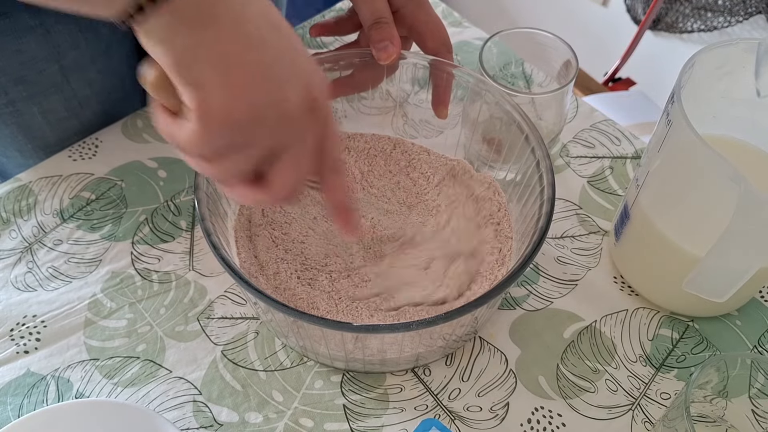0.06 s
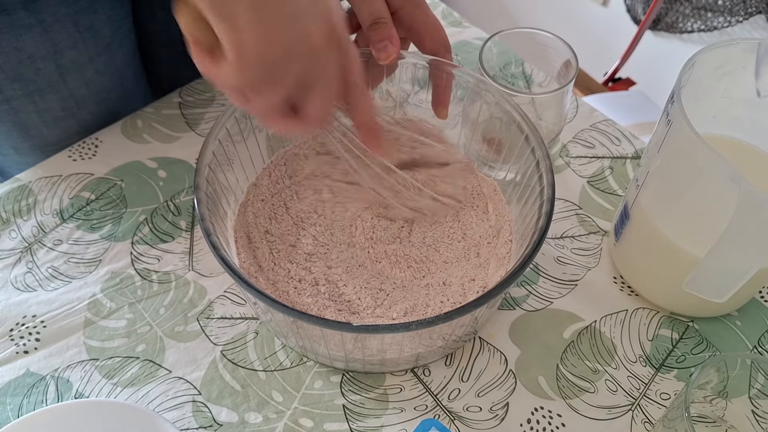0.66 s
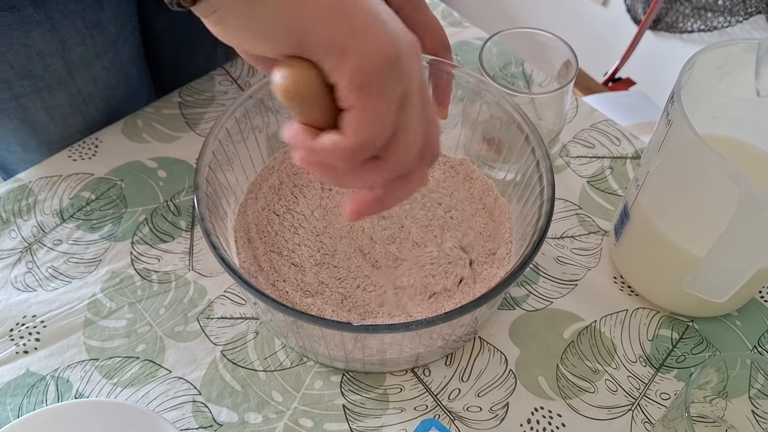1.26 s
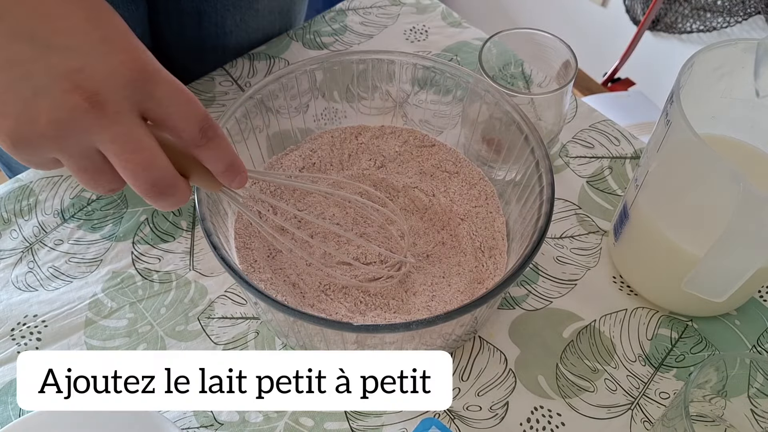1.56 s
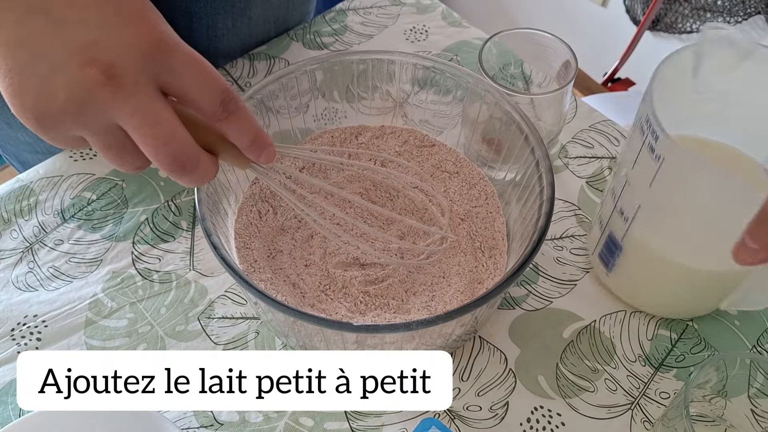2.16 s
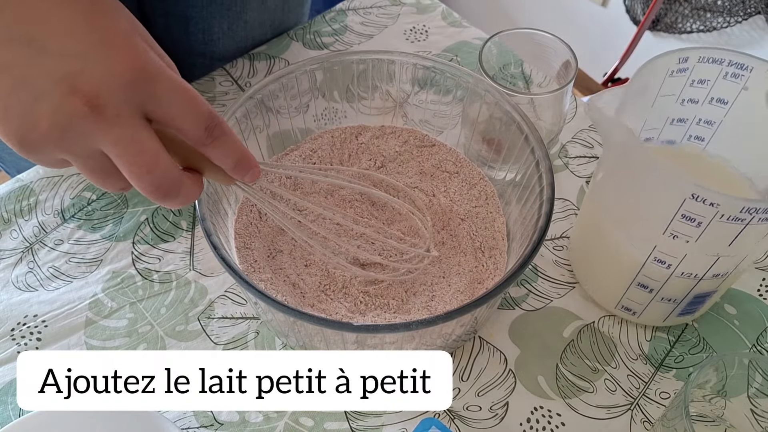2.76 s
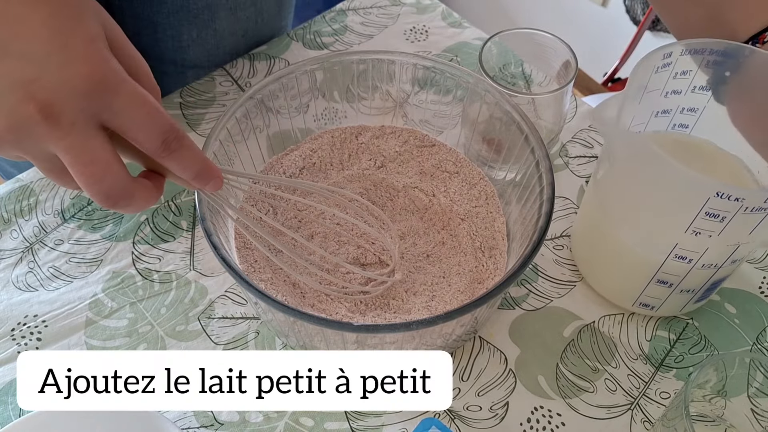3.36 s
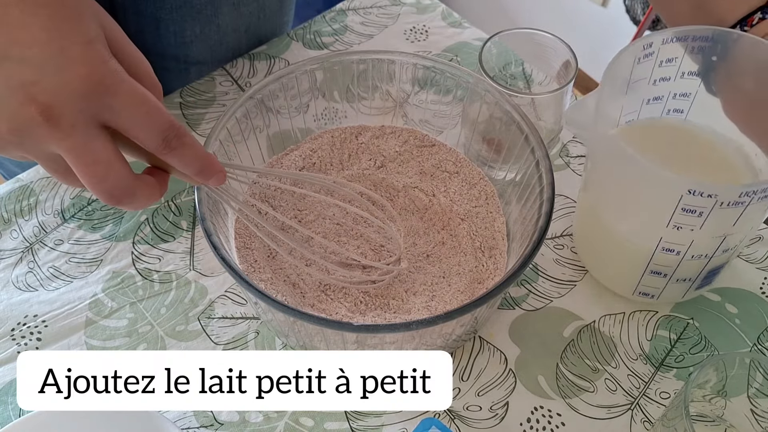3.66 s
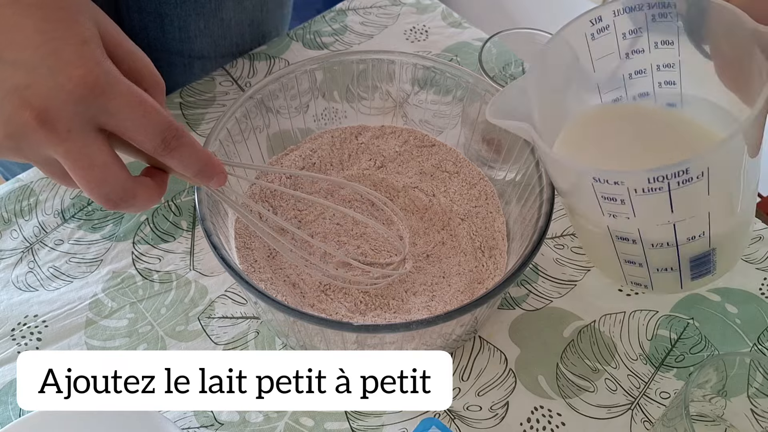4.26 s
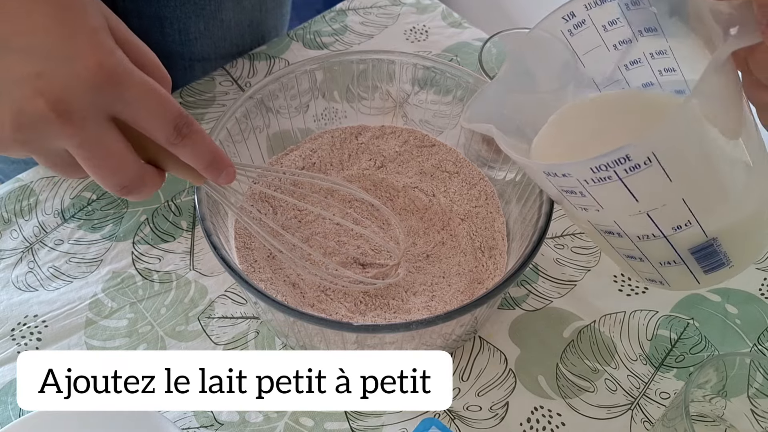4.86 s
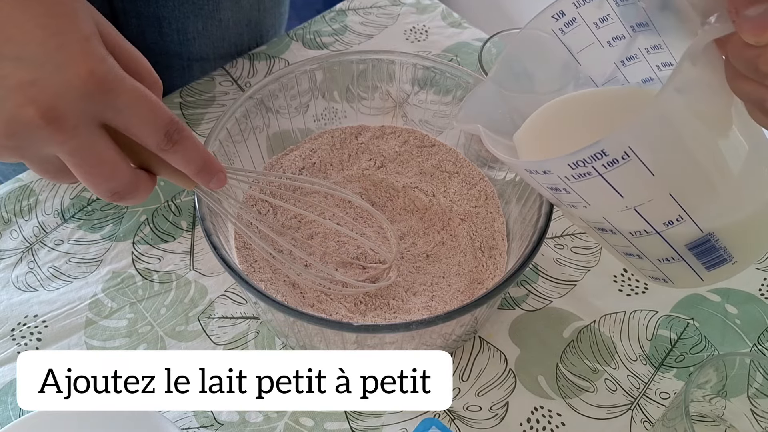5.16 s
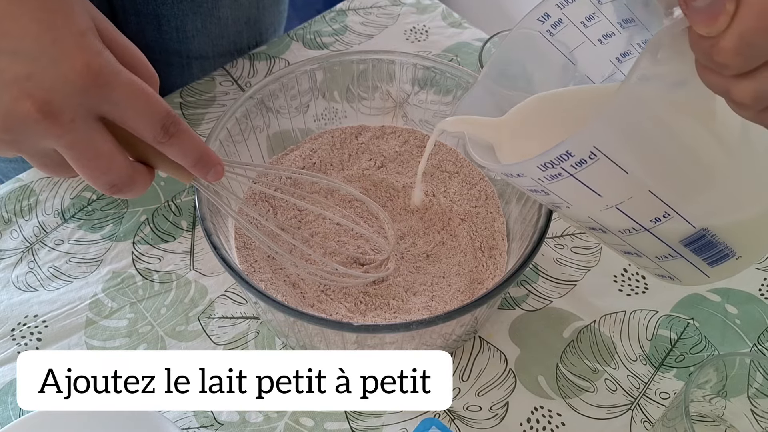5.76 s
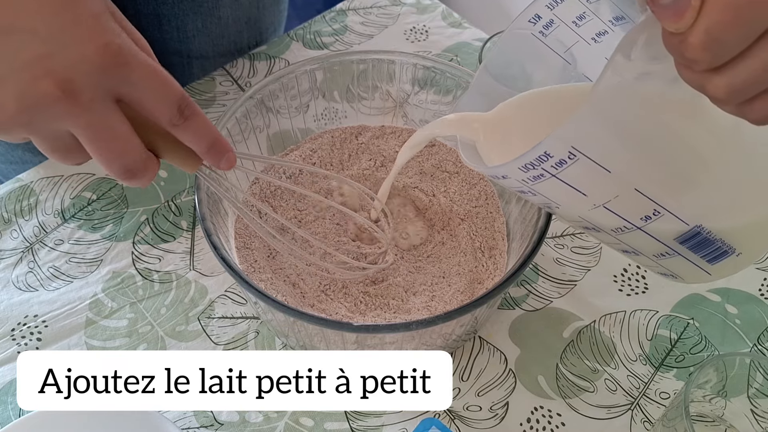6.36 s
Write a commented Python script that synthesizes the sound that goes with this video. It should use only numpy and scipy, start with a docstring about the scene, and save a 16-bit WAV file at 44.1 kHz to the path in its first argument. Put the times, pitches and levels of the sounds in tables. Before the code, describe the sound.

A wire whisk pushes through dry powder with a soft hiss and clatters against a glass bowl in short, bright bursts. The table takes a few dull bumps. After a lull with light ticks, the wires clatter again, louder. Then a jug brushes past and the first drops of milk land in faint ticks. It is heard close up in a small kitchen, over a low appliance hum.

```python
"""Dry powder hisses under a wire whisk in a thick glass bowl, and the cloth-covered table takes a soft bump.
The wires clatter on the glass in short bursts, springing back after each strike, between more
sliding powder and a few more bumps. At the end a jug is tipped and the first milk lands in faint ticks.
A small, hard kitchen answers every clink, over a low appliance hum."""
import sys
import numpy as np
from scipy import signal
from scipy.fft import rfft, irfft, next_fast_len
from scipy.io import wavfile
from scipy.ndimage import map_coordinates

SR = 44100
rng = np.random.default_rng(int(sys.argv[2]) if len(sys.argv) > 2 else 0)


def transcribe(signal):
    """Save signal, clipped to [-1, 1], as a 16-bit WAV file at the path in sys.argv[1]."""
    frames = np.atleast_2d(signal).T
    limited = np.clip(frames, -1, 1)
    pcm = np.round(limited * 32767).astype(np.int16)
    wavfile.write(sys.argv[1], SR, pcm)


N = 291015

# Wire hits on the glass. Each row: start in seconds, level in dB. All table levels are relative.
STRIKES = [(.4481, -34.5), (.4507, -33.5), (.4626, -30.5), (.504, -27), (.518, -28), (.5196, -24.5),
           (.521, -23), (.5615, -24.5), (1.3405, -37.5), (1.344, -30.5), (1.7218, -31), (1.731, -31.5),
           (1.7468, -26.5), (1.7612, -28.5), (1.7652, -25), (1.7687, -24.5), (1.7921, -25.5), (1.8097, -26),
           (2.1082, -32.5), (2.121, -30.5), (2.1298, -28), (2.1668, -26), (4.2579, -29.5), (4.2843, -24),
           (4.3011, -27.5), (4.3079, -19), (4.334, -23.5), (4.4749, -20), (4.4789, -21.5), (4.4891, -21)]
# The tone of each flurry, set by where the whisk meets the bowl. Each row: start in seconds,
# sheen in dB, clack in dB, its pitch in Hz, hollow note in dB, its pitch in Hz, its t60 in seconds,
# rebound delay in seconds, rebound level in dB, lean to the left in dB.
CLATTERS = [(.4, 3.5, -1, 2540, -13, 824, 0.037, 0.0073, -5, 0),
            (1.3, 5.5, -8.5, 2410, -12.5, 1150, .025, 0.0081, -11.5, 0),
            (1.7, 6.5, -4.5, 2320, -17.5, 715, 0.034, 0.0076, -7.5, .5),
            (2.1, 4.5, -3.5, 2630, -4, 691, 0.046, 0.0062, -10, -1),
            (4.2, 1, -4.5, 3270, -16, 1220, .05, 0.0085, -11, .5),
            (4.45, 0, -8, 2900, -13, 916, 0.13, 0.0073, -4.5, 0)]
# The ring of the filled glass bowl, when a wire strikes it and when the table is bumped.
# Each row: pitch in Hz, level in dB, t60 in seconds.
STRUCK_BOWL_MODES = [(1020, -6, .22), (1623, -5, .1), (1722, -4, .1), (2592, 1, .14), (3824, -1, .18),
                     (4576, -1, .15), (5735, 0, .2), (6749, -3, .15), (7335, -3, .18), (7621, -1, .2),
                     (9620, 2, .16), (11800, 1, .15), (13002, -1, .15)]
BUMPED_BOWL_MODES = [(205, -3, .15), (538, -9, .14), (824, -4, .12), (1020, -9, .18), (1310, -1, .3),
                     (2121, -10, .12), (3451, -9, .15), (4872, -14, .25), (6541, -16, .15)]
# The whisk pushes through powder, or powder slides off it.
# Each row: peak time in seconds, hold in seconds, hiss in dB, low rub in dB.
POWDER_STROKES = [(0, .11, -64, -65.5), (0.242, 0.16, -61, -61.5), (0.604, 0.055, -53, -64),
                  (0.787, 0.083, -70, -89), (1.018, 0.056, -73.5, -60.5), (1.967, 0.27, -68.5, -82),
                  (2.19, .45, -53.5, -72), (2.811, 0.077, -76, -73), (3.206, .4, -78.5, -72.5),
                  (4.56, 0.041, -59, -75), (6.35, 0.13, -79, -67)]
# The colour of sliding grains. Each row: frequency in Hz, level in dB.
POWDER_SPECTRUM = [(150, -13), (350, 1), (700, -5), (1300, -12), (1900, -10.5), (2150, -11.5),
                   (2500, -13.5), (4500, -15.5), (7700, -7), (9500, -12.5), (15500, -13)]
# Soft blows to the table. Each row: start in seconds, thud in dB, its pitch in Hz, knock and ring in dB.
BUMPS = [(.204, -45, 168, -48.5), (0.623, -37, 150, -71.5), (0.669, -37, 120, -66),
         (3.225, -49.5, 134.6, -86), (4.164, -39.5, 81, -37.5)]
# Touches of wire, jug and milk drops. Each row: start in seconds, crack in dB, clack in dB, its pitch in Hz.
TICKS = [(0.2137, -53.5, -53.5, 3380), (1.087, -43.5, -79, 2970), (2.633, -63, -47, 2264),
         (2.9833, -63, -58, 4030), (3.0351, -55, -62, 2990), (3.4104, -47.5, -49.5, 3290),
         (4.0565, -47.5, -58.5, 1100), (4.1393, -51.5, -74, 4570), (4.845, -52.5, -69, 3500),
         (5.3803, -55.5, -59, 710), (6.329, -51, -72, 2910), (6.3725, -53, -74, 2980),
         (6.3954, -47, -69, 2980)]
# Brushes of wire, cloth and jug.
# Each row: peak time in seconds, half length in seconds, level in dB, band centre in Hz.
SWISHES = [(0.422, .018, -55, 11000), (1.074, 0.059, -64, 6500), (4.887, 0.067, -66.5, 8030),
           (5.108, 0.03, -67, 10400), (5.597, 0.053, -70.5, 5300), (5.855, 0.027, -76.5, 7110),
           (6.404, 0.041, -66, 8000), (6.574, 0.022, -72.5, 7600)]
# The kitchen's reverb time. Each row: frequency in Hz, t60 in seconds.
ROOM_DECAY = [(150, .4), (530, .35), (1400, .33), (3700, .32), (9700, .29), (16000, .26)]
# The tone of the reverb and of each microphone port. Each row: frequency in Hz, gain in dB.
ROOM_EQ = [(150, -1.5), (800, 0.5), (2500, -1.5), (6000, 0), (10000, -3), (16000, -2.5)]
LEFT_EQ = [(1000, -1), (2700, 1), (3700, 2), (4700, 3), (6700, 0.5), (7700, 4), (8900, -1.5), (12000, -3),
           (15500, -1.5)]
RIGHT_EQ = [(1000, -2.5), (3500, -0.5), (4900, 3), (6500, -3.5), (7800, 3.5), (9000, -1), (11700, 3),
            (13000, -0.5), (15500, -0.5)]
# The room tone: hum, rumble and airy hiss. Each row: frequency in Hz, level in dB.
HUM_TONES = [(48.4, -78.5), (140.0, -73), (199.2, -70), (253.0, -76.5)]
RUMBLE_SPECTRUM = [(13, -42), (22, -16.5), (53, 4), (107, -9), (140, 3.5), (168, -13.5), (182, -8),
                   (206, 2), (264, -5.5), (285, -15), (371, -19.5), (476, -26), (846, -37.5), (900, -37.5),
                   (1170, -67), (1980, -120)]
AIR_SPECTRUM = [(410, -45), (700, -2.5), (955, -8), (1060, -7.5), (1600, -8.5), (8760, -18), (15500, -6.5)]

RISE_DB_PER_S, SAG_DB_PER_S, FALL_DB_PER_S = 450, 19.5, 141  # the envelope of a powder stroke
MONO_BELOW_HZ, TOP_HZ = 650, 15750  # echoes narrow to mono in the lows; the microphone's upper limit


def whisk_clatter():
    """Each wire hits the glass in the tone of its flurry, springs back and hits once more, weaker."""
    out = np.zeros((2, N))
    for start, db in STRIKES:
        flurry = [row for row in CLATTERS if row[0] <= start][-1]
        _, *tone, rebound_s, rebound_db, lean_db = flurry
        pan = amp(lean_db * np.array([[.5], [-.5]]))
        for at, level_db in [(start, db), (start + rebound_s, db + rebound_db)]:
            hit = clink(level_db, *tone)
            add(out, at, pan * in_kitchen(hit, near_db=-4, room_db=-4, near_t60=.035))
    return out


def clink(db, sheen_db, clack_db, clack_hz, hollow_db, hollow_hz, hollow_t60):
    """Wire on glass: a bright crack, the wall's clack and knock, the bowl's hollow note, a faint ring."""
    sheen = amp(sheen_db + .5) * burst(9000, 17000, t60=.0048)
    crack = amp(-.6) * burst(4700, 9000, t60=.0045)
    clack = burst(clack_hz / 1.6, clack_hz * 1.55, t60=.0048) + amp(-5.5) * burst(1500, 5500, t60=.054)
    knock = amp(-8.5) * burst(490, 1400, t60=.016)
    hollow = amp(hollow_db) * burst(hollow_hz / 2 ** .2, hollow_hz * 2 ** .2, hollow_t60)
    glass = amp(-24.5) * ring(STRUCK_BOWL_MODES, attack_s=.0003)
    return amp(db) * (sheen + crack + amp(clack_db) * (clack + knock) + hollow + glass)


def powder():
    """Fine grains hiss over wire and glass in small uneven slips; the pushed heap rubs lower down."""
    rest = amp(-86.5)  # a trace of hiss between strokes
    flow = rest + sum(stroke(at, hold, db) for at, hold, db, _ in POWDER_STROKES)
    push = sum(stroke(at, hold, db) for at, hold, _, db in POWDER_STROKES)
    slips = unit(amp(.4 * wobble(81) + .52 * wobble(1000)))
    hiss = amp(1.5) * flow * slips * noise(POWDER_SPECTRUM, side_db=-.5)
    rub = push * friction(centre_hz=290, octaves=.32)[0]  # mono: long waves reach both ports alike
    # a thin whistle rides on the longest slide
    whistle = stroke(peak_s=2.25, hold_s=.63, db=-70.5) * friction(centre_hz=2106, octaves=.025)
    return hiss + rub + whistle


def stroke(peak_s, hold_s, db):
    """The envelope of one push: a quick swell, a slow sag while it holds, then a fall."""
    t = np.arange(N) / SR - peak_s
    rise_db = RISE_DB_PER_S * np.minimum(t, 0)
    sag_db = SAG_DB_PER_S * np.clip(t, 0, hold_s)
    fall_db = FALL_DB_PER_S * np.maximum(t - hold_s, 0)
    return amp(db + rise_db - sag_db - fall_db)


def table_bumps():
    """A soft blow rocks the table with a dull mono thud and a knock, and the glass bowl rings briefly."""
    out = np.zeros((2, N))
    for start, thud_db, hz, knock_db in BUMPS:
        add(out, start, amp(thud_db + 4.5) * burst(hz / 1.7, hz * 1.5, t60=.28))
        bowl = amp(-7.5) * ring(BUMPED_BOWL_MODES, attack_s=.00024)
        knock = amp(2.5) * burst(130, 900, t60=.1) + amp(-6.5) * burst(990, 6600, t60=.03)
        hit = amp(knock_db - 1.5) * (bowl + knock)
        add(out, start, in_kitchen(hit, near_db=-.5, room_db=-.5))
    return out


def ticks():
    """Light touches of wire, jug and first milk drops, too weak to set the glass ringing."""
    out = np.zeros((2, N))
    for start, crack_db, clack_db, hz in TICKS:
        crack = amp(crack_db) * burst(5800, 16000, t60=.0091)
        clack = burst(hz / 1.5, hz * 1.35, t60=.051)
        body = amp(-7.5) * burst(460, 2200, t60=.04)
        add(out, start, in_kitchen(crack + amp(clack_db) * (clack + body), near_db=-3, room_db=-1.5))
    return out


def swishes():
    """Wire, cloth and jug brush past: friction swells and fades, each time in its own band."""
    t, out = np.arange(N) / SR, np.zeros((2, N))
    for peak_s, half_s, db, centre_hz in SWISHES:
        span = abs(t - peak_s) < 4 * half_s
        swell = amp(db) * np.exp(-((t[span] - peak_s) / half_s) ** 2)
        out[:, span] += swell * friction(centre_hz, octaves=.42, size=span.sum())
    return out


def in_kitchen(sound, near_db, room_db, near_t60=.0092):
    """Place a hit in the room: direct sound, quick echoes off bowl and table, then the reverb tail."""
    t = age()
    hz, when, spectra = signal.stft(rng.standard_normal((2, len(t))), SR, nperseg=256)
    spectra *= amp(along(ROOM_EQ, hz)[:, None] - 60 * when / along(ROOM_DECAY, hz)[:, None])
    tail = signal.istft(spectra, SR, nperseg=256)[1][:, :len(t)]
    tail *= 1 - np.exp(-t / .0015)  # the reverb takes a moment to build
    near = rng.standard_normal((2, len(t))) * amp(-60 * t / near_t60)
    tail_gain = amp(room_db) / np.linalg.norm(tail[0])
    near_gain = amp(near_db) / np.linalg.norm(near[0])
    mid, side = tail_gain * tail + near_gain * near
    side = signal.sosfilt(signal.butter(2, MONO_BELOW_HZ, "high", fs=SR, output="sos"), side)
    paths = np.array([mid + side, mid - side]) / np.sqrt(2)
    paths[1, 0] += 1  # the direct sound reaches the right port first
    paths[0, round(.00032 * SR)] += amp(-7.5)  # and the left later and softer
    return signal.fftconvolve(sound[None], paths, axes=1)


def room_tone():
    """A wavering appliance hum over the room's rumble and faint hiss."""
    t, hum = np.arange(N) / SR, np.zeros(N)
    for hz, db in HUM_TONES:
        level = np.sqrt(2) * amp(db + 1.5 + 3.8 * wobble(9.4))
        hum += level * np.sin(2 * np.pi * hz * t + 1.5 * wobble(25))
    rumble = amp(-64) * noise(RUMBLE_SPECTRUM, side_db=-8.5)
    air = amp(-76) * noise(AIR_SPECTRUM, side_db=1)
    lean_left = amp([[1.4], [-1.4]])
    return (hum + rumble) * lean_left + air


def burst(low_hz, high_hz, t60):
    """A crowd of heavily damped modes spread evenly over a band, with the energy of 2 ms at rms 1."""
    fade = amp(-60 * age() / t60)
    modes = rfft(rng.standard_normal(len(fade)) * fade)
    evened = irfft(modes / np.sqrt(abs(modes) + 1e-9), len(fade)) * (fade > 1e-6)
    band = signal.butter(3, [low_hz, high_hz], "band", fs=SR, output="sos")
    hit = signal.sosfilt(band, evened)
    return hit / np.linalg.norm(hit) * np.sqrt(SR / 500)


def ring(modes, attack_s):
    """Damped modes; the point of contact gives each a new strength at every blow."""
    t, tone = age(), 0
    for hz, db, t60 in modes:
        fade = amp(db + rng.normal(0, 3.5) - 60 * t / t60)
        tone += fade * np.sin(2 * np.pi * (hz * t + rng.random()))
    return (1 - np.exp(-t / attack_s)) * tone


def friction(centre_hz, octaves, size=N):
    """Grainy stereo rubbing at rms 1, in a band reaching `octaves` either side of its centre."""
    grain = amp(3 * wobble(300)[:size]) * rng.standard_normal((2, size))
    return unit(filtered(grain, lambda hz: 1 / (1 + (np.log2((hz + 1) / centre_hz) / octaves) ** 2)))


def noise(spectrum, side_db):
    """Coloured stereo noise at rms 1; side_db sets its width."""
    mid, side = filtered(rng.standard_normal((2, N)), lambda hz: amp(along(spectrum, hz)))
    return unit(np.array([mid + amp(side_db) * side, mid - amp(side_db) * side]))


def wobble(rate):
    """A smooth random curve through `rate` points a second."""
    points = rng.standard_normal(int(N * rate / SR) + 4)
    return map_coordinates(points, [np.arange(N) * rate / SR])


def filtered(x, response):
    """EQ a sound with a gain given as a function of Hz."""
    n = x.shape[-1]
    padded = next_fast_len(n + SR // 4)
    return irfft(rfft(x, padded) * response(np.fft.rfftfreq(padded, 1 / SR)), padded)[..., :n]


def along(points, hz):
    """Read a curve of (Hz, value) points on a log frequency axis."""
    freqs, values = np.transpose(points)
    return np.interp(np.log(hz + 1), np.log(freqs + 1), values)


def add(track, start, sound):
    """Mix a sound into the track at `start` seconds."""
    part = track[:, round(start * SR):][:, :sound.shape[-1]]
    part += sound[..., :part.shape[-1]]


def age():
    """Time since a blow, over half a second."""
    return np.arange(SR // 2) / SR


def amp(db):
    """Decibels to gain."""
    return 10 ** (np.asarray(db) / 20)


def unit(x):
    """Scale to rms 1."""
    return x / np.sqrt(np.mean(x ** 2) + 1e-20)


def scene():
    """The mix: everything on and around the table, over the room tone."""
    return whisk_clatter() + ticks() + table_bumps() + powder() + swishes() + room_tone()


def record(dry):
    """Two microphone ports, the left duller in the top treble, then a steep high cut."""
    ports = filtered(dry, lambda hz: amp([along(LEFT_EQ, hz), along(RIGHT_EQ, hz)]))
    return filtered(ports, lambda hz: amp(-np.clip((hz - TOP_HZ) / 22, 0, 120)))


dry = scene()
out = record(dry)
transcribe(out)
```